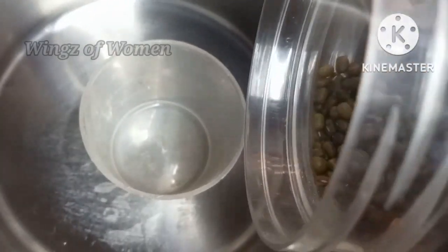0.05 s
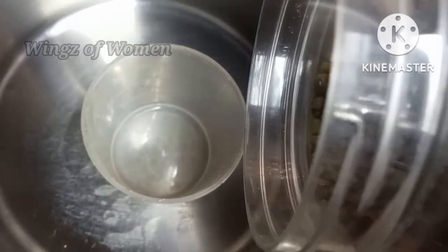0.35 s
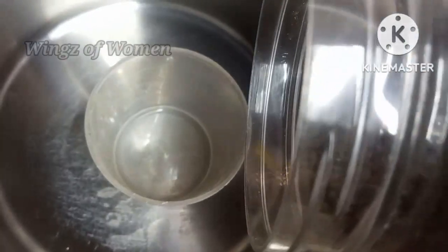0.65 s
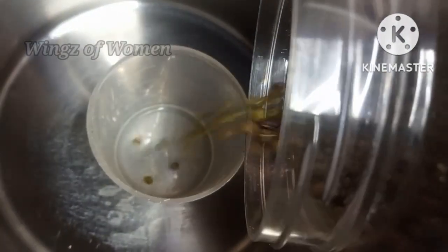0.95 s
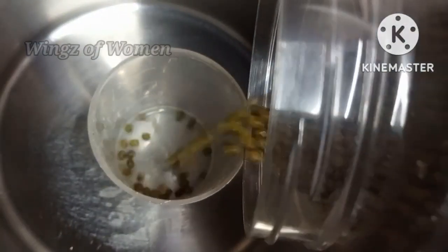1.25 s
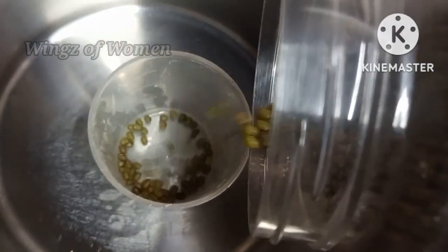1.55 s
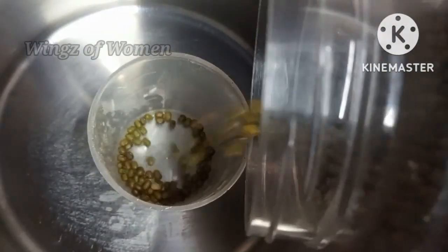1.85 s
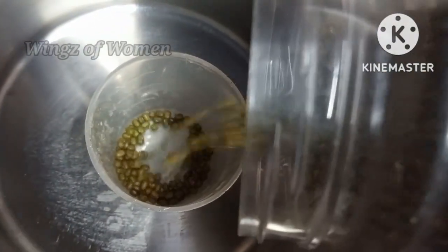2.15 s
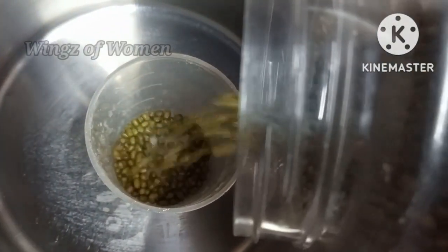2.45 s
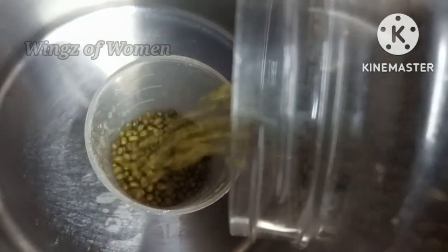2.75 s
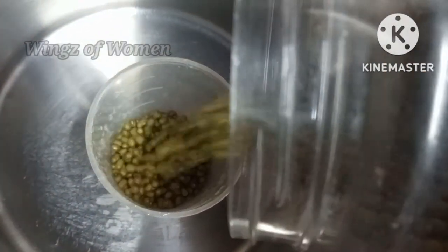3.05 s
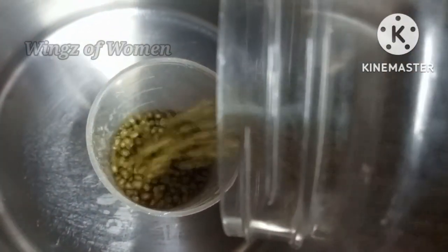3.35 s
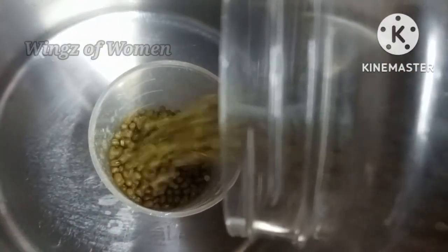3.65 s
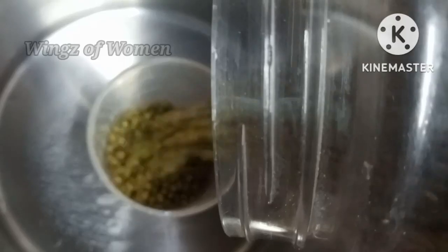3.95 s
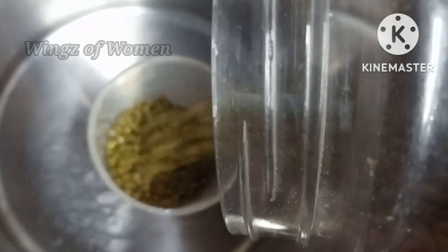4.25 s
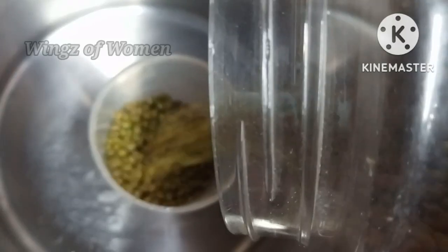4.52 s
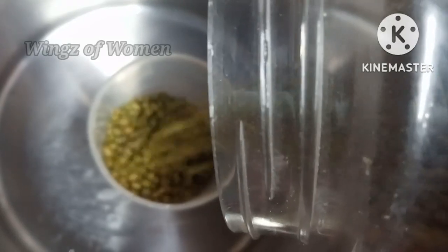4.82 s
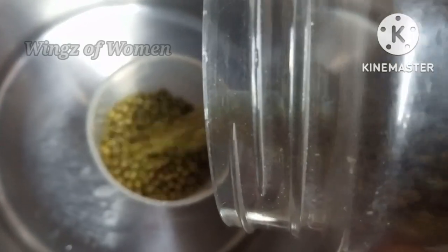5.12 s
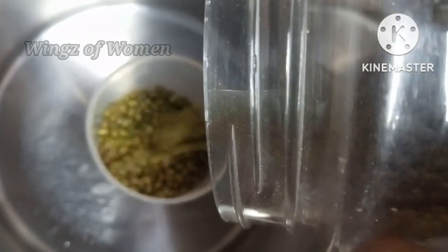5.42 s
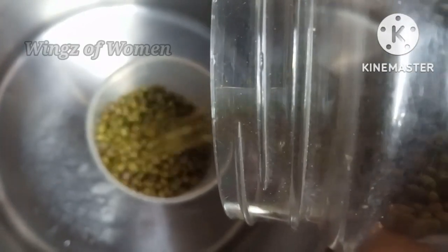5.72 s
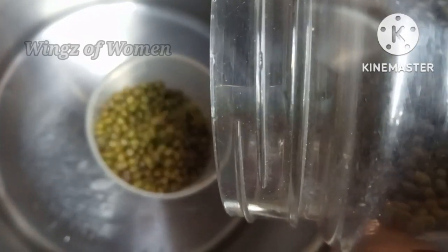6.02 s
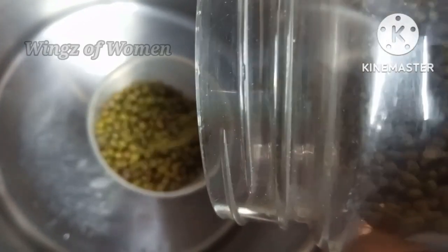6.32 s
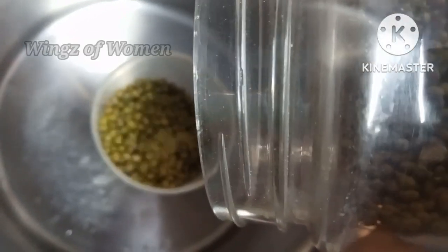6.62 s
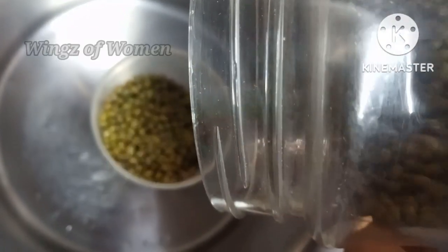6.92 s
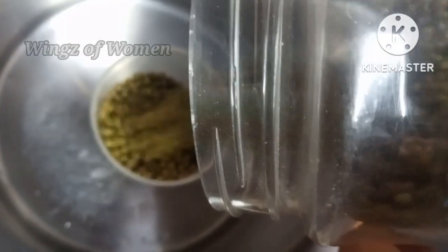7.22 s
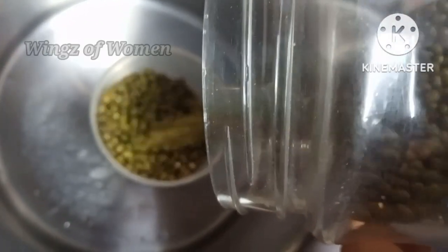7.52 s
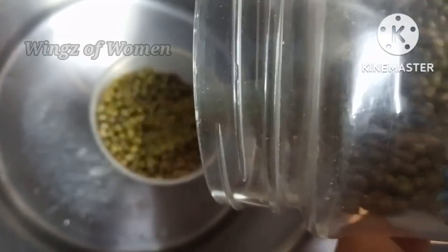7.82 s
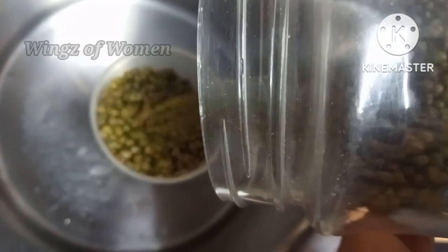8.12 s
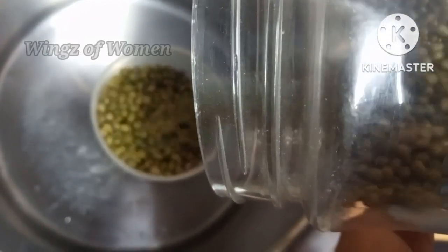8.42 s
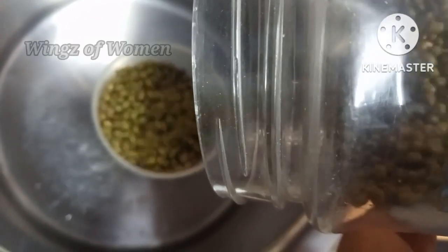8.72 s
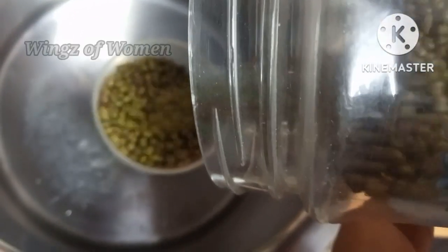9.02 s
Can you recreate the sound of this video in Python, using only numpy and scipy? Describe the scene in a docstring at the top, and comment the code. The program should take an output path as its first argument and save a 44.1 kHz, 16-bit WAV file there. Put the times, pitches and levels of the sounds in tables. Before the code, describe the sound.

In a small, faintly hissing kitchen, dried beans are poured from a plastic jar into a plastic cup right by the microphone. After a brief sliding rattle, the first beans knock hard on the bare bottom. The growing pile then muffles the cup, leaving a crisp patter with small rushes and single clicks. Late in the pour, a stray bean lightly pings a steel vessel.

```python
"""In a small kitchen, dried beans slide along a tilted plastic jar and pour into a plastic cup
that stands in a steel vessel. The first ones hit the bare cup so hard that they thump the close
microphone. Then a heap builds up, muffles the cup and turns the rattle into a dry, bright patter.
One stray bean pings on the steel. The walls add a short echo, and the room hisses faintly."""
import sys
import numpy as np
from scipy import signal
from scipy.fft import rfft, irfft, next_fast_len
from scipy.io import wavfile
from scipy.ndimage import uniform_filter1d, map_coordinates

SR = 44100
rng = np.random.default_rng(int(sys.argv[2]) if len(sys.argv) > 2 else 0)


def int16_out(signal):
    """Quantize to a 16-bit WAV file."""
    q = np.round(np.clip(np.atleast_2d(signal).T, -1, 1) * 32767)
    wavfile.write(sys.argv[1], SR, q.astype(np.int16))


N = 408807
TOP_HZ, SIZE = 15550, 4096  # highest frequency kept; samples in one hit
TIME = np.arange(N) / SR
AGE = np.arange(SIZE) / SR  # seconds since a hit
HZ = np.fft.rfftfreq(SIZE, 1 / SR)


def amp(db):
    """Turn decibels into a gain."""
    return 10 ** (np.asarray(db) / 20)


def along(points, hz):
    """Read a curve of (frequency, value) points on a log frequency axis."""
    f, v = np.transpose(points)
    return np.interp(np.log(hz + 1), np.log(f + 1), v)


def peaks(modes):
    """Boost in dB around each frequency at which something rings."""
    return sum(db / (1 + (2 * (HZ - hz) / width) ** 2) for hz, width, db in modes)


def causal(db):
    """A filter with these gains that rings only after the hit, never before."""
    cepstrum = irfft(db * np.log(10) / 20)
    cepstrum[..., 1:SIZE // 2] *= 2
    cepstrum[..., SIZE // 2 + 1:] = 0
    return np.exp(rfft(cepstrum))


def running_rms(x, seconds):
    """Level over a short sliding window."""
    power = uniform_filter1d(x * x, max(int(seconds * SR), 1), mode="constant")
    return np.sqrt(np.abs(power) + 1e-14)


def at_level(sounds, db, seconds):
    """Scale each short sound so that its loudest moment has the given level."""
    return sounds * amp(db)[:, None] / running_rms(sounds, seconds).max(axis=-1, keepdims=True)


def place(times, sounds):
    """Add up short sounds, each starting at its time."""
    index = np.round(np.maximum(times, 0) * SR).astype(int)[:, None] + np.arange(sounds.shape[1])
    return np.bincount(index.ravel(), sounds.ravel(), N)[:N]


# the steady run over the jar's lip, set by its tilt: (time [s], level [dB])
STEADY_RUN = [(0, -32), (.58, -36.5), (.68, -29), (1.08, -32.5), (1.76, -30.5), (1.91, -37), (2.09, -25),
              (2.3, -25.5), (2.52, -21), (3, -22.5), (3.8, -25), (4.45, -28), (5.2, -24.5), (6.45, -24.5),
              (6.92, -31), (7.06, -22), (7.85, -24.5), (9.27, -23.5)]
# the pile in the jar gives way and extra beans rush out: (time [s], length [s], level [dB])
RUSHES = [(0.204, 0.024, -28.5), (0.718, 0.21, -22.5), (1.187, 0.54, -21.5), (2.356, 0.045, -23),
          (4.652, 0.13, -25.5), (5.273, .12, -23.5), (5.42, .5, -26), (6.388, 0.089, -23.5),
          (6.543, .06, -23), (7.17, 0.2, -22.5), (7.34, 0.14, -20.5), (8.034, 0.088, -17.5),
          (8.276, 0.035, -27), (8.357, 0.24, -24), (9.122, 0.15, -26.5)]


def bean_flow(rise_s=0.02, fade_s=0.32, wobbles_per_s=16, wobble_db=0.96):
    """Strength of the pour in dB: a steady run, sudden rushes and a slight wobble."""
    power = amp(np.interp(TIME, *np.transpose(STEADY_RUN))) ** 2
    for start, length, db in RUSHES:
        rise = np.clip((TIME - start) / rise_s, 0, 1)
        fade_db = -60 * np.maximum(TIME - start - length, 0) / fade_s
        power += (rise * amp(db + np.maximum(fade_db, -60))) ** 2
    wobble = map_coordinates(rng.standard_normal(SIZE), [TIME * wobbles_per_s])
    return 10 * np.log10(power) + wobble_db * wobble


# how crowded the stream is at average flow: (time [s], hits [1/s])
CROWDING = [(0, 900), (.6, 690), (.75, 3300), (.95, 2800), (1, 480), (2, 570), (2.9, 1520), (4.2, 2250),
            (5.3, 1500), (6.5, 550), (7.3, 1630), (9.3, 1250)]


def bean_stream(flow_db, crowding=0.4, spread_db=5.0, snap=4.2, brightening=0.44, piece_samples=512):
    """Countless small, unequal hits; a stronger flow is louder, denser and brighter."""
    surge_db = flow_db - flow_db.mean()
    rate = np.interp(TIME, *np.transpose(CROWDING)) * amp(crowding * surge_db)
    hits = (rng.random(N) < rate / SR) * amp(spread_db * np.clip(rng.standard_normal(N), -2, 2))
    # each hit is one clean snap and a short scatter among its neighbours
    fade = hit_fade(t60=0.0083, tail_db=-15, tail_t60=0.047)
    scatter_power = np.abs(signal.fftconvolve(hits ** 2, fade ** 2)[:N])
    force = snap * hits * rng.choice([-1, 1], N) + np.sqrt(scatter_power) * rng.standard_normal(N)
    # short pieces let the tone change as the cup fills
    pieces = np.pad(force, (0, -N % piece_samples)).reshape(-1, piece_samples)
    starts = TIME[::piece_samples]
    tone_db = bean_tone(len(starts), scatter_db=2.0, tilt_db=0.5)
    tone_db += brightening * surge_db[::piece_samples, None] * HZ / TOP_HZ
    rattle = place(starts, ring_surface(starts, pieces, tone_db))
    return rattle / running_rms(rattle, 0.047) * amp(flow_db - 0.5)


def hit_fade(t60, tail_db, tail_t60):
    """A sharp crack, then echoes between cup, jar and vessel; a t60 is the seconds to fade by 60 dB."""
    return amp(-60 * AGE / t60) + amp(tail_db - 60 * AGE / tail_t60)


def bean_tone(count, scatter_db, tilt_db, bands=14):
    """Beans differ in size, hardness and landing spot: a smooth random tone curve in dB for each."""
    draws = rng.standard_normal((count, bands + 1))
    position = HZ / TOP_HZ
    bumps = np.maximum(1 - np.abs(position * (bands - 1) - np.arange(bands)[:, None]), 0)
    return scatter_db * draws[:, 1:] @ bumps + tilt_db * draws[:, :1] * np.minimum(position, 1)


# what the beans land on: (time [s], surface [0 jar wall, 1 bare cup, 2 shallow heap, 3 deep heap])
LANDING = [(0, 0), (.94, 0.5), (.98, 1.3), (1.2, 1), (2.6, 1), (3.1, 1.16), (3.5, 1.5), (4, 1.77), (4.7, 2),
           (5.4, 2.5), (6.3, 3)]
# the overall tone of each surface: (frequency [Hz], level [dB])
JAR_TONE = [(40, -31.3), (150, -24.5), (500, -24), (1300, -28), (2500, -8.5), (4200, -5), (5500, 2.5),
            (8700, -1), (9500, -12.5), (12000, -18.5), (13200, -20), (15300, -14.9)]
CUP_TONE = [(40, -29), (130, -20.5), (400, -15.5), (900, -20), (1700, -16.5), (2400, -1.3), (4200, -4.5),
            (8700, -2), (10300, -9), (12300, -14), (13300, -0.5), (15300, -7.5)]
SHALLOW_TONE = [(40, -43), (130, -31), (400, -29), (900, -40.5), (1700, -28.5), (2400, -18.5), (4200, -14),
                (6500, 0.0), (9000, -3.5), (10400, -19), (12200, -14.5), (13200, -12.5), (15300, -12)]
DEEP_TONE = [(40, -41), (130, -29), (400, -26), (900, -29.5), (1600, -25), (2200, -19.5), (4200, -12),
             (5200, -3.5), (7200, 0.5), (10500, -18), (12200, -20.5), (13600, -14), (15300, -14.5)]
# where each surface rings: (frequency [Hz], width [Hz], boost [dB])
JAR_RINGS = [(2560, 230, 8), (3180, 470, 10.5), (5200, 379, 8), (6070, 300, 2.5), (7285, 160, 4)]
CUP_RINGS = [(1247, 152, 18), (2000, 165, 9.8), (2526, 120, 10.3), (2820, 146, 8.5), (3146, 270, 9.8),
             (3460, 80, 7.5), (3703, 310, 9), (4870, 940, 7.1), (5900, 98, 6.4), (6100, 780, 6.2),
             (6800, 580, 5.9), (7933, 120, 7.5), (8600, 670, 6.8), (11370, 580, 4.5)]
SHALLOW_RINGS = [(423, 220, 6.7), (1242, 260, 13.6), (2000, 87, 7.4), (2790, 250, 9.6), (3470, 200, 8.5),
                 (5020, 308, 3.6), (6700, 150, 6.8), (8600, 590, 4)]
DEEP_RINGS = [(425, 280, 5.9), (1188, 130, 11.5), (1950, 165, 9.6), (2550, 336, 11.9), (3334, 150, 7.2),
              (6387, 470, 9.4), (8610, 390, 5.8)]


def ring_surface(times, forces, tone_db):
    """Each hit rings what it lands on; one surface blends into the next as the cup fills."""
    surfaces = [(JAR_TONE, JAR_RINGS), (CUP_TONE, CUP_RINGS),
                (SHALLOW_TONE, SHALLOW_RINGS), (DEEP_TONE, DEEP_RINGS)]
    surface_db = np.array([along(tone, HZ) + peaks(rings) for tone, rings in surfaces])
    landing = np.interp(times, *np.transpose(LANDING))
    shares = np.maximum(1 - np.abs(landing[:, None] - np.arange(len(surfaces))), 0)
    response = causal(shares @ surface_db + cup_air(times) + tone_db)
    return irfft(rfft(forces, SIZE) * response / np.linalg.norm(response, axis=1, keepdims=True))


# the hollow note of the air in the cup: (time [s], pitch [Hz], boost [dB], overtone boost [dB])
CUP_AIR = [(2.5, 1190, -3, -4), (2.9, 1210, 3, -3.5), (3.4, 1290, 6.5, 10), (3.999, 1345, 8, 3),
           (5.4, 1350, 11, -1), (7, 1370, 0.5, -2), (9.3, 1380, -4, 3.5)]


def cup_air(times, width_hz=110, overtone_ratio=2.82, overtone_width_hz=600):
    """Boost in dB from the air above the heap, which rings higher as the space gets shorter."""
    row_times, *columns = np.transpose(CUP_AIR)
    hz, db, overtone_db = [np.interp(times, row_times, column)[:, None] for column in columns]
    return peaks([(hz, width_hz, db), (overtone_ratio * hz, overtone_width_hz, overtone_db)])


# how long the kitchen echoes: (frequency [Hz], time to fade by 60 dB [s])
ECHO_FADE = [(300, 0.21), (2500, 0.28), (7000, 0.048), (14000, 0.095)]


def kitchen_echo(sound, delay_s=0.005):
    """Hard walls close by throw the sound back; the treble dies first."""
    hz, t, spectrum = signal.stft(rng.standard_normal(SR // 2), SR, nperseg=256)
    fade = amp(-60 * t / along(ECHO_FADE, hz)[:, None])
    tail = signal.istft(spectrum * fade, SR, nperseg=256)[1]
    delayed = np.pad(sound, (round(delay_s * SR), 0))
    return signal.fftconvolve(delayed, tail / np.linalg.norm(tail))[:N]


# the tone of the quiet kitchen: (frequency [Hz], relative level [dB])
ROOM_TONE = [(20, -20), (60, -4), (160, -7), (600, -0.5), (1200, -5), (8000, -22)]


def room_noise(level_db):
    """The faint, steady noise of the room."""
    noise = signal.fftconvolve(rng.standard_normal(N), irfft(causal(along(ROOM_TONE, HZ))))[:N]
    return amp(level_db) * noise / noise.std()


def single_hits(times, db, fade, snap, tone):
    """Each bean rings the surface with a snap and a fading burst of noise, in a tone of its own."""
    cracks = rng.standard_normal((len(times), SIZE)) * fade
    cracks[:, 0] += snap
    tone_db = bean_tone(len(times), scatter_db=3.0, tilt_db=2.5) + along(tone, HZ)
    return at_level(ring_surface(times, cracks, tone_db), db, seconds=0.0018)


def clicks(times, db):
    """Beans that tumble in the jar or bounce on the heap sound thinner and brighter than the stream."""
    fade = hit_fade(t60=0.0098, tail_db=-15.5, tail_t60=0.042)
    thin_tone = [(800, -3.0), (3500, -2.5), (7000, 1.0), (15000, 1.0)]
    return place(times, single_hits(times, db, fade, snap=4.2, tone=thin_tone))


# the hardest single beans: (time [s], relative level [dB])
LOUD_BEANS = [(0.0178, -11.5), (0.2332, -6), (0.2414, -11), (0.3307, -3), (0.393, -3), (0.41, -6),
              (0.485, -3.5), (0.6682, -4.5), (0.8498, -8), (0.9122, -3.5), (1.0375, 0), (1.268, -2),
              (1.4502, 0), (1.5327, 1), (1.6776, -2.5), (2.054, -4.5), (2.134, -3), (2.168, -4.5),
              (2.3471, -0.5), (5.4103, -5), (5.682, -5), (5.9091, -2), (5.9612, -5.5), (6.122, -3.5),
              (6.1556, -2), (6.2803, -4), (6.3904, -1.5), (6.423, -5), (6.4734, -11), (6.5914, -3),
              (6.7108, -2), (6.7408, -4), (6.756, 0), (6.8306, -5), (6.8673, -3), (6.8802, -4),
              (6.9213, -2.5), (6.9721, -3.5), (7.01, -2.5), (7.1074, -1.5), (7.6784, -5.5), (8.2621, -2),
              (8.306, -1), (8.706, -0.5), (8.9109, -1.5), (8.971, -5)]


def loud_beans(gain_db):
    """A few beans hit hard enough to click out above the stream."""
    times, db = np.transpose(LOUD_BEANS)
    return clicks(times, db + gain_db)


# beans skip off the bare cup, sink into the shallow heap and skip again as it nears the rim:
# (time [s], how often [relative])
SKIPPING = [(0, .7), (1.1, .4), (1.3, .9), (1.7, .9), (1.8, .1), (2.55, .9), (2.9, .08), (5.3, .05),
            (5.8, .7), (6.5, 1.8), (6.85, .6), (7.7, 1.2), (9.27, .9)]


def skipping_beans(flow_db, level_db, count=130, follow_flow=0.53, spread_db=2.5):
    """Quieter beans skip at random moments; a stronger flow throws them harder."""
    so_far = np.cumsum(np.interp(TIME, *np.transpose(SKIPPING)))
    turns = (np.arange(count) + rng.random(count)) / count
    times = np.interp(turns, so_far / so_far[-1], TIME)
    surge_db = np.interp(times, TIME, flow_db - flow_db.mean())
    return clicks(times, level_db + follow_flow * surge_db + spread_db * rng.uniform(-1.03, 1, count))


# beans that fall straight onto the cup's bottom, with relative levels:
# (time [s], crack [dB], thump [dB], knock [dB])
BOTTOM_HITS = [(0.978, -5, -28, -22), (1.1134, -2.5, -26, -20), (1.1381, -3.5, -35, -31),
               (1.1754, 2, -37, -28), (1.2086, -3.5, -33.5, -31), (1.255, -1.5, -24, -19.5),
               (1.2938, -1, -33, -25), (1.3117, -6, -22.5, -22.5), (1.3347, -2.5, -26, -22),
               (1.3594, -4.5, -23, -23), (1.4388, 0, -22, -22), (1.479, -1.5, -29, -20.5),
               (1.4952, -3, -25, -25), (1.5606, -3, -29.5, -25.5), (1.586, -1.5, -29.5, -20),
               (1.597, -0.5, -25, -23.5), (1.6658, -5, -34, -20), (1.6913, -1, -44, -19),
               (1.7823, -6, -23.5, -16), (1.8112, -1, -41, -23), (1.8409, -3, -32, -22),
               (1.8645, -3, -32.5, -20.5), (1.923, -2, -26.5, -28), (1.948, -4.5, -28, -23),
               (1.9828, -3, -37, -24), (2.0169, -2, -27, -12.5), (2.0267, -8.5, -27, -22),
               (2.1058, -2, -24.5, -24), (2.1801, -4.5, -28.5, -24), (2.2154, -3, -25.5, -22),
               (2.2624, -3, -28.5, -28), (2.2882, -5.5, -50, -31), (2.431, 0, -26.5, -24),
               (2.465, -4.5, -26, -18.5), (2.4976, 0, -32, -25), (2.5456, -2.5, -30.5, -31),
               (2.588, -4.5, -38, -28), (2.6814, -7, -34, -26.5), (2.7178, -8.5, -36, -18)]
# the tone of their low thump and their hollow knock: (frequency [Hz], relative level [dB])
THUMP_TONE = [(15, -51), (50, -6.5), (110, 2), (200, -1.5), (450, -6.5), (1000, -21.5), (4000, -49)]
KNOCK_TONE = [(30, -34), (200, -5.5), (600, 2.5), (1400, -0.5), (2500, -3.5), (8000, -63)]


def bare_cup_hits(crack_gain_db, thump_gain_db, knock_gain_db):
    """A bean on the bare bottom cracks, knocks and gives the microphone one low push."""
    times, crack_db, thump_db, knock_db = with_bounces(BOTTOM_HITS).T
    fade = hit_fade(t60=0.028, tail_db=-19.5, tail_t60=0.059)
    crack_tone = [(1200, -1.4), (3000, 1.0), (15000, -0.21)]
    crack = single_hits(times, crack_db + crack_gain_db, fade, snap=5.9, tone=crack_tone)
    thump = at_level(push(THUMP_TONE, len(times), stretch=0.18), thump_db + thump_gain_db, 0.0038)
    knock = at_level(push(KNOCK_TONE, len(times), stretch=0.31), knock_db + knock_gain_db, 0.0029)
    return place(times, crack + thump + knock)


def push(tone, count, stretch):
    """Short pulses; a longer touch shifts the whole tone down, a shorter one up."""
    shift = np.exp(stretch * rng.standard_normal((count, 1)))
    return irfft(causal(along(tone, HZ * shift)))


# a bounce keeps its tick but hardly thumps; its loss in dB is scaled by:
# (crack [factor], thump [factor], knock [factor])
BOUNCE_LOSS = [0.78, 1.4, 1.15]


def with_bounces(rows, flight_s=0.012, flight_spread=0.4, base_loss_db=7, glancing_db=11.5):
    """Each bean hops and lands once more, weaker; a glancing hop loses the most."""
    first = np.array(rows)
    flight = flight_s * np.exp(flight_spread * rng.standard_normal(len(first)))
    loss_db = (base_loss_db + glancing_db * rng.random((len(first), 1))) * BOUNCE_LOSS
    second = np.column_stack([first[:, 0] + flight, first[:, 1:] - loss_db])
    return np.vstack([first, second])


# the stray bean: (time [s], level [dB])
STRAY_BEAN = [(6.88, -29)]
# the steel vessel's notes: (frequency [Hz], relative level [dB], time to fade by 60 dB [s])
STEEL_NOTES = [(2013, -3, 0.16), (2530, -17, 0.21), (2735, -10, 0.12), (3510, -1, 0.095), (4457, -5, 0.17)]


def steel_ping():
    """The steel rings briefly under a stray bean."""
    times, db = np.transpose(STRAY_BEAN)
    ping = sum(amp(level - 60 * AGE / t60) * np.sin(2 * np.pi * hz * AGE)
               for hz, level, t60 in STEEL_NOTES)
    return place(times, at_level(ping, db, seconds=0.004))


def scene():
    """The stream, the single beans and the kitchen around them."""
    flow_db = bean_flow()
    beans = bean_stream(flow_db) + loud_beans(gain_db=-7.5)
    beans += skipping_beans(flow_db, level_db=-15.5) + steel_ping()
    hard_hits = bare_cup_hits(crack_gain_db=-7, thump_gain_db=7.5, knock_gain_db=2.0)
    echo = amp(-11.5) * kitchen_echo(beans) + amp(-32.5) * kitchen_echo(hard_hits)
    return (beans + hard_hits + echo + room_noise(level_db=-59.5))[None]


def record(dry, ceiling=0.85):
    """Round off the highest peaks and keep nothing above TOP_HZ."""
    rounded = dry / (1 + np.abs(dry / ceiling) ** 6) ** (1 / 6)
    size = next_fast_len(N + SIZE)
    kept = np.fft.rfftfreq(size, 1 / SR) < TOP_HZ
    return irfft(rfft(rounded, size) * kept, size)[:, :N]


dry = scene()
out = record(dry)
int16_out(out)
```